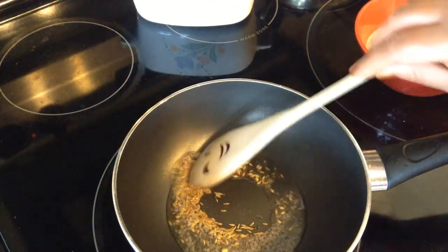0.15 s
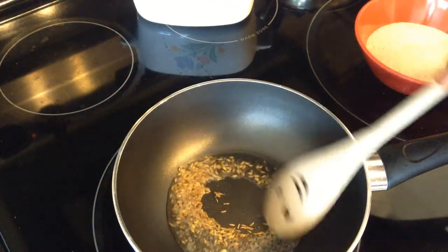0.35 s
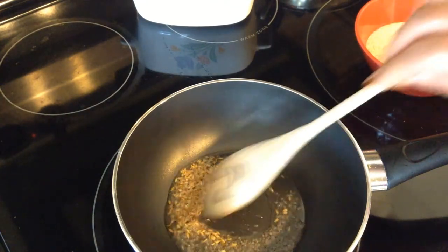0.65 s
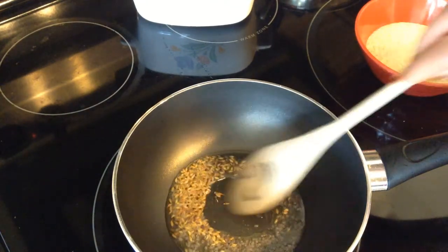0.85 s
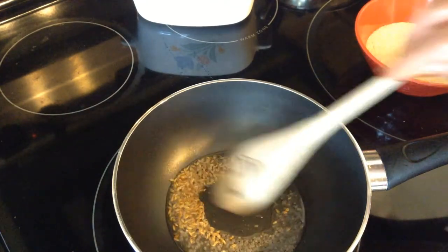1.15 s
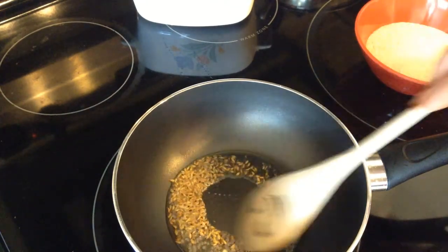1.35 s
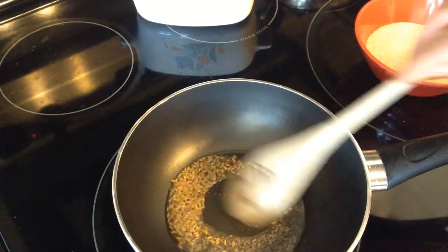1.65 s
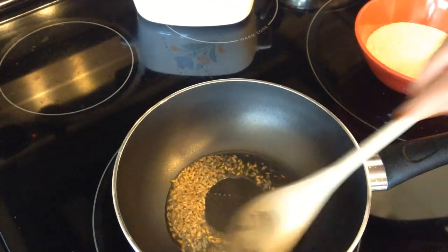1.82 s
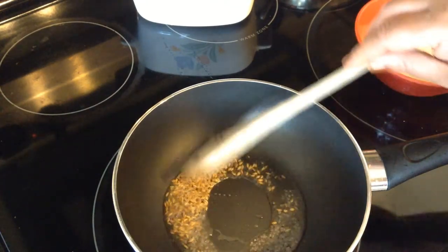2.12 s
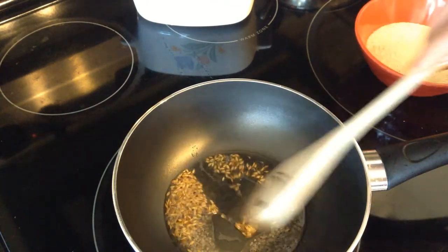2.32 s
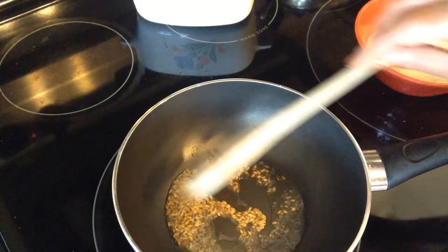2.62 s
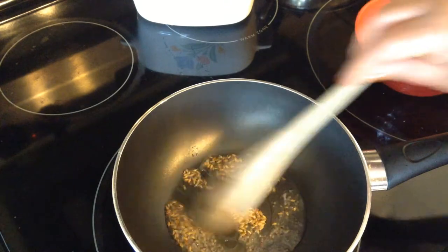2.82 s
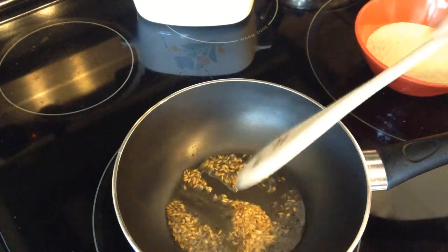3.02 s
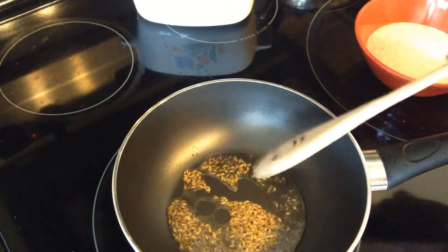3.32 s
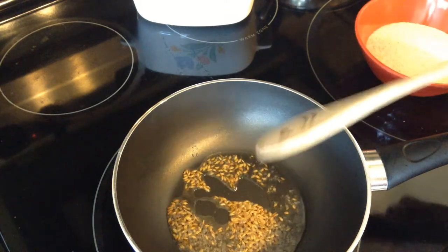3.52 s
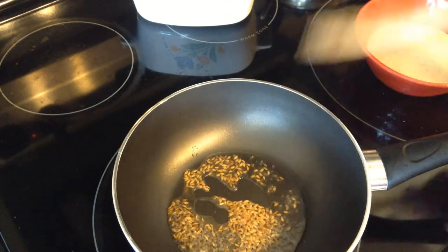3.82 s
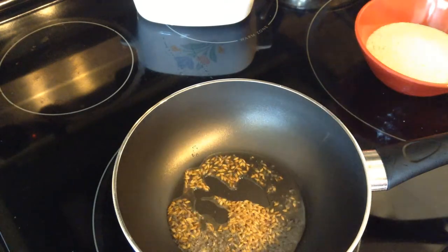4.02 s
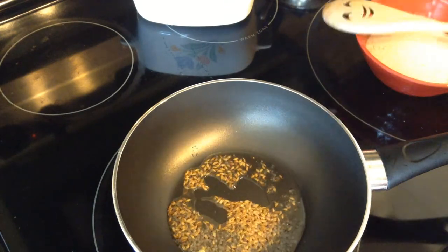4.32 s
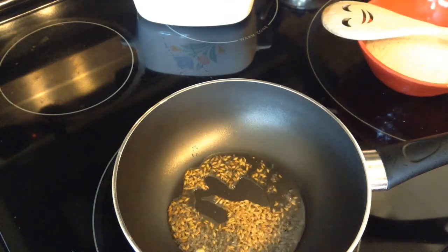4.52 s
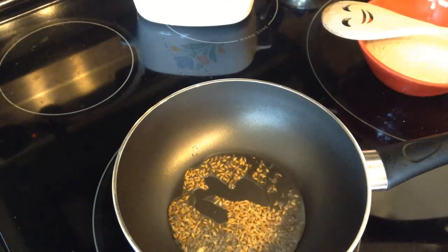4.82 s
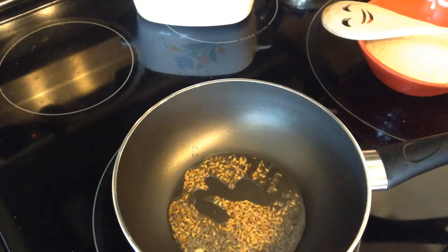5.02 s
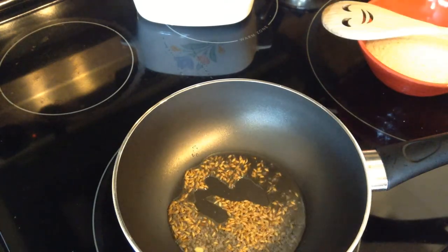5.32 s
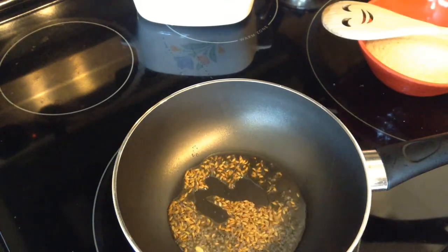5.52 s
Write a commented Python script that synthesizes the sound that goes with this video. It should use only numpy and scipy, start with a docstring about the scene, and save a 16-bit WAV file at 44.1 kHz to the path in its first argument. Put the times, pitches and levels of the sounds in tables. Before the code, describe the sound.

A thin, bright sizzle and quiet room hum run throughout. Sharp seed pops scatter over it, some in tight clusters, with short metallic bounces from the pan. A wooden spoon stirs with soft scrapes and hollow knocks at first, stops, then clatters lightly as it is set down late on. The final cracks are strong and jolt the close microphone with low thuds. Indoor, short room echo, centred mono sound.

```python
"""A low hum and the bright fizz of hot oil fill a small kitchen throughout, both shaped from noise.
Over them seeds crack in the pan, as snaps with a torn shell, a ringing husk and bounces off the metal.
For three seconds a wooden spoon slides and knocks, noise and blows ringing modes, with one early sine squeak.
From 1.4 s some bursts also jolt the microphone into a low thump, a pressure push through a bass cut.
After 4.3 s the spoon is laid down beside the pan in a few blows, and the last seeds keep cracking."""
import sys
import numpy as np
from scipy import signal
from scipy.fft import rfft, irfft, next_fast_len
from scipy.io import wavfile

SR = 44100
rng = np.random.default_rng(int(sys.argv[2]) if len(sys.argv) > 2 else 0)


def generate_wav(sig):
    """Save sig (samples, or channels by samples) to the path in sys.argv[1] as 16-bit PCM at SR."""
    pcm = np.round(np.clip(np.atleast_2d(sig).T, -1, 1) * 32767).astype(np.int16)
    wavfile.write(sys.argv[1], SR, pcm)


N = 249209

# bursts that jolt the microphone; colour of the snap is against 9 kHz:
# (t/s, relative thump/dB, relative snap/dB, colour at 1.7 kHz/dB, colour at 5 kHz/dB)
JOLTING_BURSTS = [(1.3638, -21, 6.5, 3, -5.5), (1.9954, -4, 11, -5, -3.5), (3.3643, 1.5, 5.5, 1, 4.5),
                  (3.8791, -13.5, -6, -15, -4), (4.4294, -1, 6, -4.5, -7), (4.9405, 9, 2.5, 7, -9),
                  (4.9836, -3.5, -3.5, -10, -2), (5.0383, 5, 14, 6, -1.5), (5.3766, 9, 3, 6, -14)]


def amp(db):
    """Turns decibels into an amplitude factor."""
    return 10 ** (np.asarray(db) / 20)


def evened(x):
    """Scales to an rms of 1."""
    return x / np.sqrt(np.mean(x ** 2) + 1e-20)


def unit(x):
    """Scales to an energy of 1."""
    return x / np.sqrt(np.sum(x ** 2) + 1e-20)


def read(points, hz):
    """Joins (f/Hz, value) points on a log-frequency axis."""
    f, value = np.transpose(points)
    return np.interp(np.log(hz + 1), np.log(f + 1), value)


def add(mix, s, sound):
    """Lays a sound into the mix at s seconds."""
    part = mix[max(round(s * SR), 0):][:len(sound)]
    part += sound[:len(part)]


def coloured(x, spectrum):
    """Filters a sound by a gain curve of (f/Hz, gain/dB) points."""
    size = next_fast_len(len(x), real=True)
    gain = amp(read(spectrum, np.fft.rfftfreq(size, 1 / SR)))
    return irfft(rfft(x, size) * gain, size)[:len(x)]


def causal(spectrum, size=512):
    """The shortest click with this spectrum: minimum phase, from the Hilbert transform of the log gain."""
    log_gain = np.log(amp(read(spectrum, abs(np.fft.fftfreq(size, 1 / SR)))))
    return np.fft.ifft(np.exp(np.conj(signal.hilbert(log_gain)))).real


def band_limit(x, size=255, edge_hz=15400):
    """Steep low-pass at the upper edge of the band, without delay."""
    taps = signal.firwin(size, edge_hz, window=("kaiser", 7), fs=SR)
    return signal.oaconvolve(x, taps, "same")


def body(modes, size=6000):
    """The ring of a struck object: a sum of dying sines, wider resonances dying faster."""
    t = np.arange(size) / SR
    ring = np.zeros(size)
    for k, (hz, width, db) in enumerate(modes):
        decay = width * np.exp(-np.pi * width * t)
        ring += (-1) ** k * amp(db) * decay * np.sin(2 * np.pi * hz * t)
    return unit(ring)


def hum(drone_hz=206, drone_width_hz=16, drone_db=-60, hum_db=-54):
    """Low steady noise of the kitchen, with one wavering drone of narrow-band noise in it."""
    # colour of the hum: (f/Hz, relative level/dB)
    hum_spectrum = [(25, -47), (65, -49.5), (90, -20.5), (125, -5), (165, 4.5), (220, -5.5), (260, -6),
                    (320, -3), (380, -7.5), (460, -8.5), (570, -13.5), (800, -14), (1300, -24.5),
                    (2400, -70), (4000, -53)]
    narrow = signal.iirpeak(drone_hz, drone_hz / drone_width_hz, SR)
    drone = signal.lfilter(*narrow, signal.lfilter(*narrow, rng.standard_normal(N)))
    low_noise = coloured(rng.standard_normal(N), hum_spectrum)
    return amp(hum_db) * evened(low_noise) + amp(drone_db) * evened(drone)


def kitchen(x, gap_s=0.0027, size=18000):
    """Diffuse echo of the room: noise after a short gap, each band dying at its own speed."""
    # reverberation of the kitchen: (f/Hz, time to fall by 60 dB/s)
    decay_times = [(150, 0.69), (1000, 0.35), (5000, 0.47), (15000, 0.22)]
    noise = rng.standard_normal(size) * (np.arange(size) / SR > gap_s)
    hz, t, bands = signal.stft(noise, SR, nperseg=256)
    bands = bands * amp(-60 * t / read(decay_times, hz)[:, None])
    tail = unit(signal.istft(bands, SR, nperseg=256)[1])
    return signal.oaconvolve(x, tail)[:N]


def sizzle(per_s=6000, spread_db=3.0, wash=1., flutter_db=2.2, level_db=3.0, count=200):
    """Thousands of tiny steam bubbles a second merge into a bright fizz, as random clicks plus noise."""
    # colour of the fizz: (f/Hz, relative level/dB)
    sizzle_spectrum = [(300, -17), (1200, -16), (2200, -14.5), (3200, -10), (4200, -10), (5600, -6),
                       (7500, -5.5), (9000, -2.5), (11000, -1), (13500, 1.5), (15300, 0.5)]
    # strength of the frying: (t/s, level before lift and flutter/dB)
    heat_curve = [(0, -46), (.7, -45), (1.6, -43.5), (2.3, -44), (2.6, -42.5), (3.5, -46), (5.65, -45)]
    sizes = amp(spread_db * np.minimum(rng.exponential(1, N), 4)) * rng.choice([-1, 1], N)
    clicks = sizes * (rng.random(N) < per_s / SR)
    bubbles = evened(clicks) + wash * rng.standard_normal(N)
    t, knots = np.arange(N) / SR, np.linspace(0, N / SR, count)
    heat_db = np.interp(knots, *np.transpose(heat_curve)) + flutter_db * rng.standard_normal(count)
    swell = np.interp(t, knots, amp(level_db + heat_db))
    return evened(coloured(bubbles, sizzle_spectrum)) * swell


def dips(half_s=0.0113, size=3000):
    """Gain curve of brief, flat-bottomed dips in level."""
    # the dips: (t/s, depth/dB)
    dip_list = [(.953, 9.5), (2.277, 10), (2.361, 10), (2.578, 8), (2.746, 17), (3.128, 4), (3.3, 6),
                (3.812, 8), (3.94, 10.5), (4.707, 7.5), (4.858, 7), (5.072, 8), (5.242, 10)]
    t = np.linspace(0, N / SR, size)
    depth_db = sum(db * np.exp(-np.square(((t - s) / half_s) ** 2)) for s, db in dip_list)
    return np.interp(np.arange(N) / SR, t, amp(-depth_db))


def ticks(per_s=30, energy_db=-26, spread_db=2.2, snap_s=0.0008, ring_s=0.0071, count=12, size=700):
    """Small bubbles burst at random: decaying noise, each kind tuned to its own pitch."""
    t, out = np.arange(size) / SR, np.zeros(N)
    envelope = np.exp(-t / snap_s) + 0.36 * np.exp(-t / ring_s)
    bursts = rng.standard_normal((count, size)) * envelope
    kinds = []
    for burst, hz in zip(bursts, np.geomspace(6500, 14500, count)):
        pitch = causal([(hz / 6, -22), (hz / 1.3, -8), (hz, 0), (hz * 1.3, -3)])
        kinds.append(unit(np.convolve(burst, pitch)))
    chances = rng.random(size=(600, 3))
    for k, (when, chance, strength) in enumerate(chances):
        if chance < per_s * N / SR / len(chances):
            db = energy_db + spread_db * min(-np.log(strength), 3.5)
            add(out, when * N / SR, amp(db) * kinds[k % count])
    return out


def squeak():
    """Wood squeaks on the coating: one sine whose pitch and level glide from point to point."""
    # course of the squeak: (t/s, f/Hz, level/dB)
    squeak_curve = [(0.914, 1110, -38), (0.934, 1253, -48), (.952, 1286, -40), (.965, 1240, -60),
                    (.975, 1140, -59.5)]
    s, hz, db = np.transpose(squeak_curve)
    t, out = np.arange(s[0], s[-1], 1 / SR), np.zeros(N)
    phase = 2 * np.pi * np.cumsum(np.interp(t, s, hz)) / SR
    add(out, s[0], amp(np.interp(t, s, db)) * np.sin(phase))
    return out


def blows(table, chatter=.8, chatter_s=.006, size=1500):
    """Force of wood landing: one push and a short chatter; a softer contact has less treble."""
    t, force = np.arange(size) / SR, np.zeros(N)
    for s, db, hz in table:
        rattle = unit(rng.standard_normal(size) * np.exp(-t / chatter_s))
        push = unit(1. * (t == 0) + chatter * rattle)
        add(force, s, amp(db) * signal.lfilter(*signal.butter(1, hz, fs=SR), push))
    return force


def spoon(slips_per_s=2000, knock_db=-2, rest_db=-1, rest_clack_db=-9, bass_cut_hz=140):
    """Tiny slips of the sliding spoon and its knocks ring pan and wood; then it is laid down."""
    # slides over the bottom of the pan: (t/s, relative level/dB, length/s)
    stroke_list = [(0.037, -40.5, 0.11), (0.45, -40.5, 0.13), (0.876, -46.5, 0.16), (1.372, -42, 0.081),
                   (1.783, -41.5, 0.079), (2.046, -52.5, 0.077), (2.195, -46, 0.044), (2.769, -51.5, 0.13)]
    # the spoon meets the wall of the pan:
    # (t/s, relative energy/dB, low-pass corner f/Hz, clack of the wood against the pan/dB)
    knock_list = [(0.896, -7.5, 2000, -8), (1.401, -4, 6000, -10), (1.801, -1, 4120, -3.5),
                  (2.092, 0, 3470, 2.5), (2.445, -5.5, 296, -11.5), (2.777, 2, 900, -4.5)]
    # the spoon lands beside the pan: (t/s, relative energy/dB, low-pass corner f/Hz)
    landing_list = [(4.317, -3, 4000), (4.338, -15, 2000), (4.401, 1, 3070), (4.408, -13, 2500),
                    (4.459, -6, 1200), (4.478, -16.5, 1200)]
    # resonances of the pan, of the spoon on its resting place, and dull ones of the wood itself:
    # (f/Hz, width/Hz, relative level/dB)
    pan_modes, rest_modes, wood_modes = [(200.5, 33, 1), (329, 51, 0), (500, 103, -25), (825, 113, 1),
                                         (942, 183, 1), (1024, 107, 4), (1240, 166, -2), (1375, 200, -8),
                                         (1690, 142, -2.5), (2110, 340, -8.5), (2960, 860, -13)], [(200, 210, -6), (342, 180, -3.5), (460, 71, 0.5),
                                                      (644, 120, -3.5), (908.7, 65, 0.5), (1350, 180, -4),
                                                      (1500, 310, -4.5), (3420, 14400, -13)], [(767, 154, 12.5), (1650, 270, 10.5),
                                                                    (2500, 380, -12.5)]
    rub = np.zeros(N)
    slips = evened(rng.standard_normal(N) * (rng.random(N) < slips_per_s / SR))
    for s, db, length in stroke_list:
        add(rub, s, amp(db) * np.sin(np.linspace(0, np.pi, round(length * SR))))
    slide = coloured(rub * slips, [(200, -3.0), (750, -2.0), (1150, 0), (3000, -1.5), (8000, 26.0)])
    pan_blows = [(s, db, hz) for s, db, hz, _ in knock_list]
    wood_blows = [(s, db + wood_db, hz) for s, db, hz, wood_db in knock_list]
    knocks = amp(knock_db) * blows(pan_blows, chatter=0.19, chatter_s=0.011)
    clacks = amp(knock_db) * blows(wood_blows, chatter=0.53, chatter_s=0.0042)
    laid = amp(rest_db) * blows(landing_list, chatter=0.94, chatter_s=0.0066)
    rung = [(slide + knocks, pan_modes), (laid, rest_modes),
            (clacks + amp(rest_clack_db) * laid, wood_modes)]
    sound = sum(signal.oaconvolve(force, body(modes))[:N] for force, modes in rung)
    # small things radiate little bass
    return signal.lfilter(*signal.butter(2, bass_cut_hz, "high", fs=SR), sound)


def thumps(push_s=0.00014, cut_hz=183, quality=1.73, leak=0.15, skirt=0.2, level_db=2.5, size=2000):
    """A one-sided jolt of pressure swings out through the bass cut of the microphone."""
    age, out, w = np.arange(size) / SR / push_s, np.zeros(N), 2 * np.pi * cut_hz  # age in pushes
    jolt = age * np.exp(-age) + 0.06 * np.exp(-age / 10) * (1 - np.exp(-age))
    bass_cut = signal.bilinear([1, skirt * w, 0], [1, w / quality, w * w], SR)
    swing = unit(signal.lfilter(*bass_cut, jolt) + leak * jolt)
    for s, db, *_ in JOLTING_BURSTS:
        add(out, s, amp(db + level_db) * swing)
    return out


def crack(energy_db, low_db, mid_db, top_db, ring_db, husk_hz, husk_db, tear=0.99, tear_s=0.00032,
          ring_s=0.005, lumpy_db=2, echo_s=0.0035, echo=0.42, bass_db=-8, glint_db=2, husk_s=.0018,
          lead=128, size=2400):
    """One seed: a snap, a moment of tearing shell, a ringing husk, and the sound bouncing round the pan."""
    t = np.arange(size) / SR
    shell, scatter, lumps = rng.standard_normal((3, size))
    torn = unit(shell * np.exp(-(t / tear_s) ** 2) * (t > 0))
    snap = unit(1. * (t == 0) + tear * torn)
    build_up = 1 - np.exp(-(t / 0.00146) ** 2)
    bounces = unit(scatter * amp(lumpy_db * lumps) * np.exp(-t / ring_s) * build_up)
    bounces = unit(bounces + echo * np.roll(snap, round(echo_s * SR)))  # one strong early reflection
    colour = [(120, low_db + bass_db), (600, low_db + bass_db), (1700, low_db), (5000, mid_db), (9000, 0.014)]
    direct = np.convolve(snap, causal(colour + [(13000, top_db)]))
    # bare metal mirrors the treble best
    bounced = np.convolve(bounces, causal(colour + [(13000, top_db + glint_db)]))
    age = np.arange(len(direct)) / SR
    husk = np.exp(-age / husk_s) * np.sin(2 * np.pi * husk_hz * age)
    # silent lead-in leaves room for the filter's pre-ringing
    direct, bounced, husk = (unit(band_limit(np.r_[np.zeros(lead), x])) for x in (direct, bounced, husk))
    return amp(energy_db) * (direct + amp(husk_db) * husk), amp(energy_db + ring_db) * bounced


def seeds(level_db=-0.21, lead_s=128 / SR):
    """All the loud bursts: the direct snaps, and what the pan throws out."""
    # bursting seeds; body at 1.7 kHz and top at 13 kHz are against 9 kHz:
    # (t/s, relative energy/dB, body/dB, top/dB, note of the burst husk f/Hz)
    pop_list = [(.1011, -12, -8, 5, 13950), (.3805, -8.5, -17, 3.5, 9610), (0.4602, -6, -1, 5.5, 8250),
                (.738, -12.5, -4.5, 6, 3896), (0.8909, 7.5, -21, 1.5, 9480), (1.0765, 4, -7.5, -5.5, 8740),
                (1.1944, -3, -9.5, 6.5, 13700), (1.2326, -8, -10, -1, 4700), (1.234, -2.5, -6, -1, 14600),
                (1.467, 2.5, -4.5, 4.5, 5083), (1.5685, -6.5, -18, -3, 4760), (1.7135, 2, -8, 3, 13930),
                (1.741, -20, -6, -4, 4330), (2.0646, -7, -23, 4, 14300), (2.1628, 3.5, -12, 4, 14600),
                (2.2617, -12, -21, 10, 12900), (2.4439, -5, -12.5, 1, 10440),
                (2.4784, -4.5, -22, -10, 9350), (2.6575, -19, -7, -1, 11600), (2.7665, 3.5, -7.5, 1, 11720),
                (2.776, -6.5, -8, -7, 9700), (2.8215, 4.5, -21, 8, 12640), (2.8307, 2, -8, 2.5, 10750),
                (2.9514, -1, -14.5, -1, 6796), (3.0966, 6, -7.5, 4, 13000), (3.2361, -10, -10, 2.5, 14320),
                (3.6918, 6.5, -18.5, 2, 14270), (3.724, -10, -25, 3, 8800), (3.8466, 5, -13.5, 5, 11800),
                (3.8787, 3.5, -16.5, 0, 14230), (3.9932, 6, -7, 9, 9100), (3.9969, 2, -18, 1, 7730),
                (4.041, -11.5, -13, -9, 4750), (4.0836, -13.5, -24, -8, 7850), (4.316, -4.5, -16, -1, 6125),
                (4.8234, 3, -14, 3.5, 9440), (4.947, -7, -28, 15, 13370), (4.981, 1, -4.5, 4.5, 12560),
                (4.9837, 7.5, -19, 0.5, 9180), (5.0923, -16, -20, 5, 3506), (5.1485, 1.5, -20, -7, 8920),
                (5.2974, -2.5, -20, -15, 6290), (5.3632, 6, -12, 3, 14050), (5.48, 6, -12, 0.5, 14650)]
    snaps, thrown = np.zeros(N), np.zeros(N)
    bursts = []
    for s, db, body_db, top_db, husk_hz in pop_list:
        mid_db = 6.5 + 0.74 * body_db  # the colour at 5 kHz follows the body
        ring_db = -4 - 0.22 * db  # harder bursts are drier
        husk_db = -6.5 - 0.5 * db  # harder bursts tear the husk apart
        bursts.append((s, db, body_db, mid_db, top_db, ring_db, husk_hz, husk_db))
    for s, _, db, body_db, mid_db in JOLTING_BURSTS:  # close and dry
        bursts.append((s, db, body_db, mid_db, -1, -16, 7920, -16))
    for s, *burst in bursts:
        direct, bounced = crack(*burst)
        add(snaps, s - lead_s, direct)
        add(thrown, s - lead_s, bounced)
    return amp(level_db) * snaps, amp(level_db) * thrown


def scene(pop_echo_db=-9.0, spoon_echo_db=-7.0):
    """Everything is heard from one point above the pan, the same in both channels."""
    # the pan throws mostly the treble of the pops into the room: (f/Hz, gain/dB)
    thrown_spectrum = [(300, -21), (1500, -0.5), (4000, 2), (8000, 3), (15000, 6)]
    snaps, thrown = seeds()
    wood = spoon() + squeak()
    to_room = amp(pop_echo_db) * coloured(thrown, thrown_spectrum) + amp(spoon_echo_db) * wood
    dipping = dips() * (sizzle() + kitchen(to_room))
    mono = hum() + dipping + ticks() + wood + thumps() + snaps + thrown
    return np.array([mono, mono])


def record(dry, ceiling=0.95):
    """Clips peaks that pass the ceiling, as in an overload, then limits the band."""
    return np.array([band_limit(channel) for channel in np.clip(dry, -ceiling, ceiling)])


dry = scene()
out = record(dry)
generate_wav(out)
```